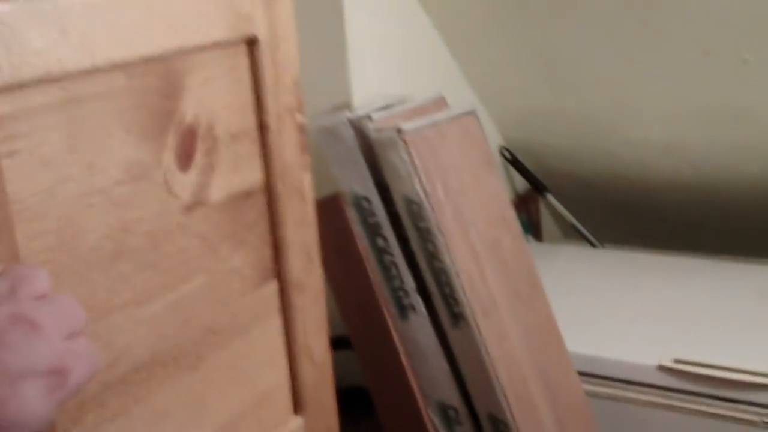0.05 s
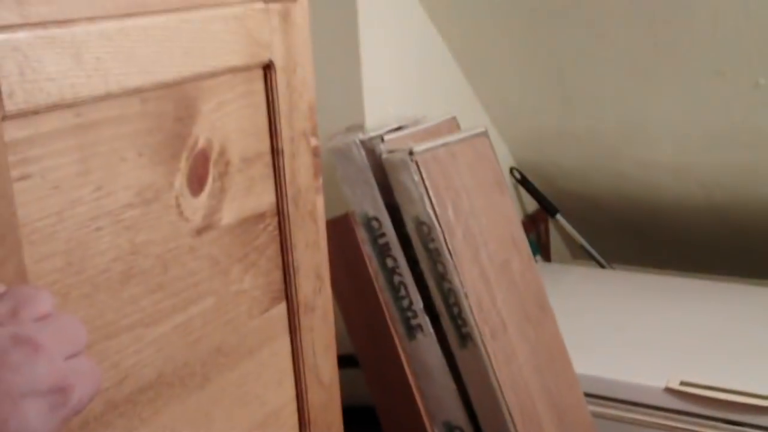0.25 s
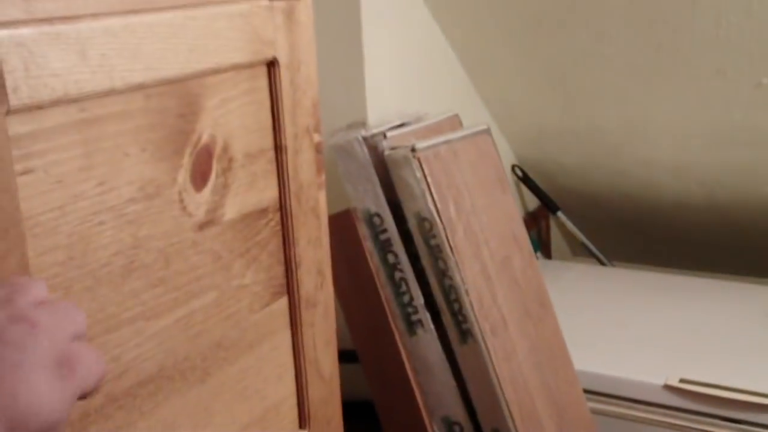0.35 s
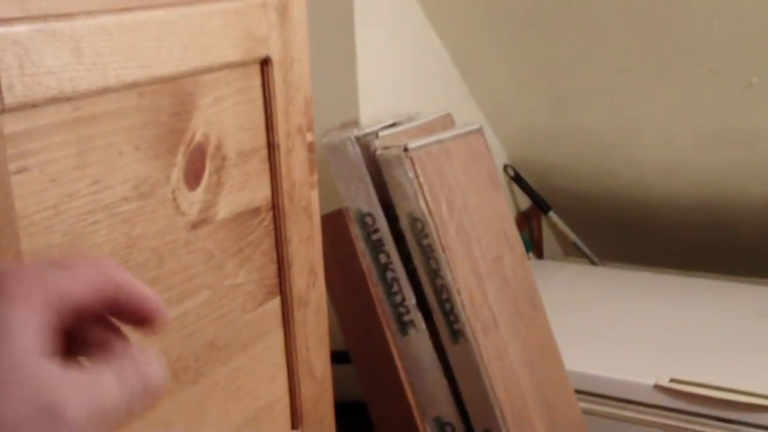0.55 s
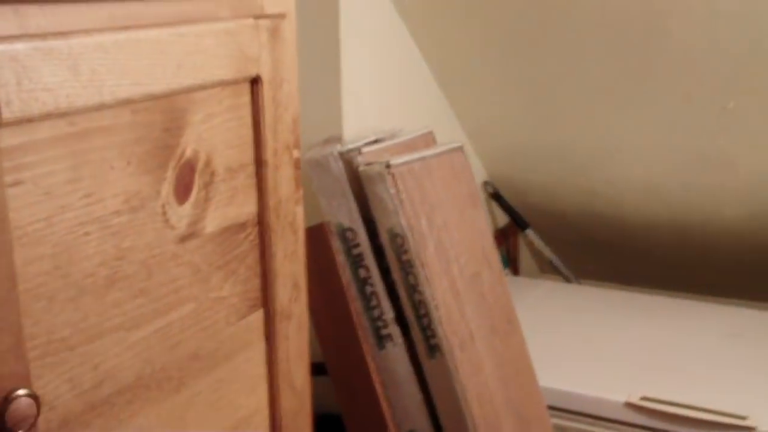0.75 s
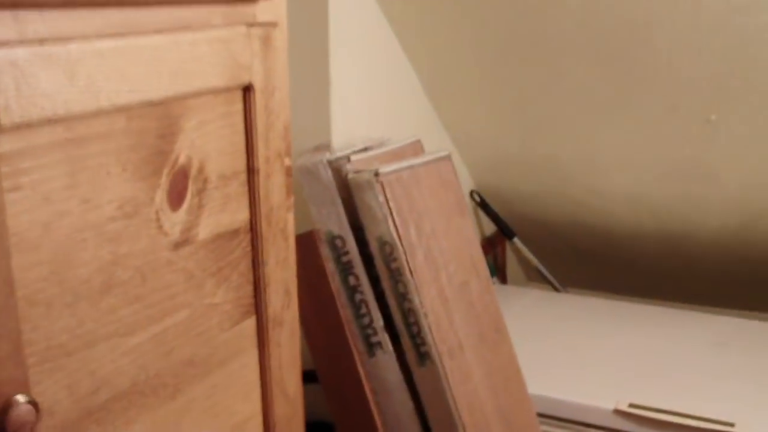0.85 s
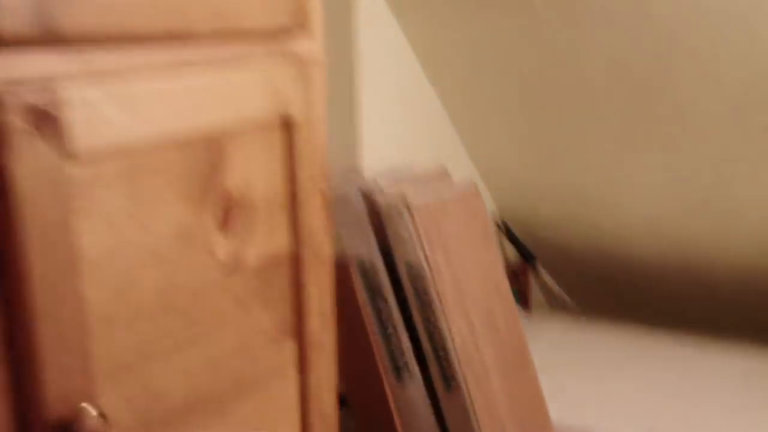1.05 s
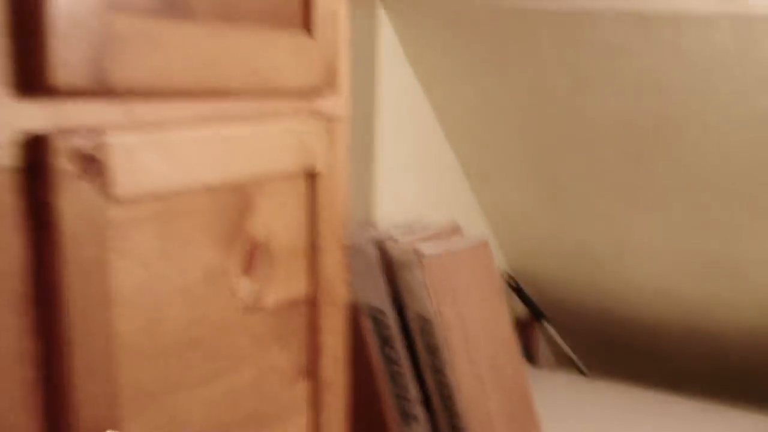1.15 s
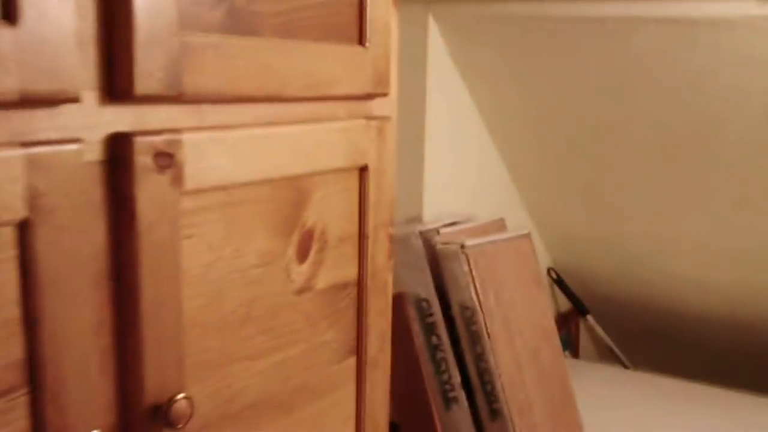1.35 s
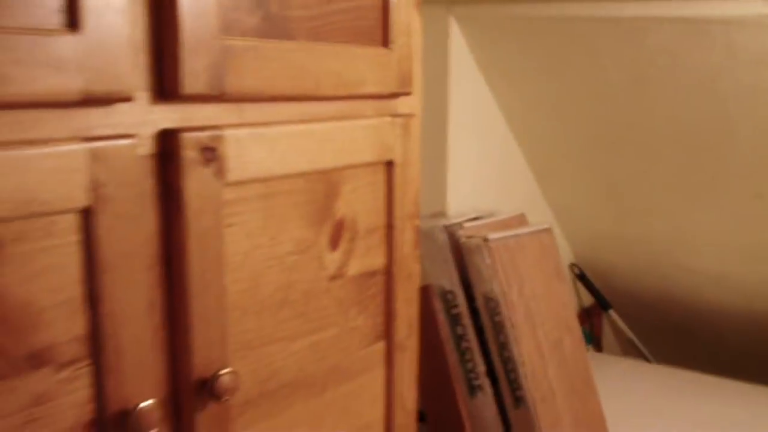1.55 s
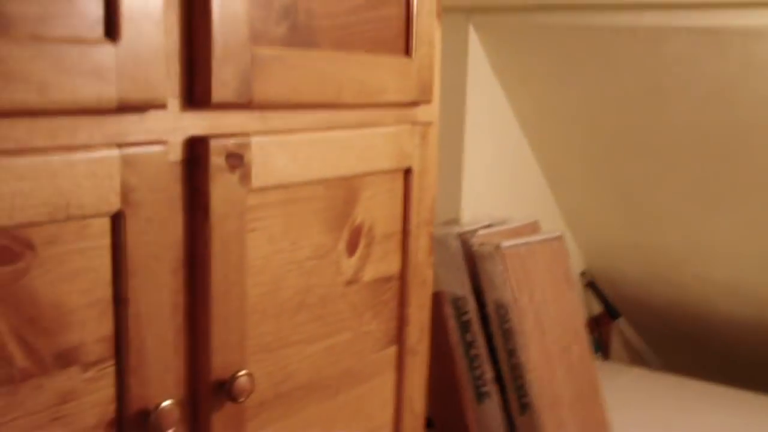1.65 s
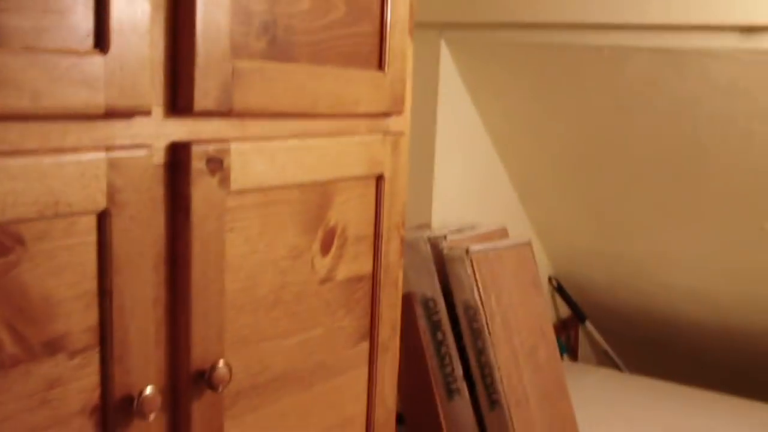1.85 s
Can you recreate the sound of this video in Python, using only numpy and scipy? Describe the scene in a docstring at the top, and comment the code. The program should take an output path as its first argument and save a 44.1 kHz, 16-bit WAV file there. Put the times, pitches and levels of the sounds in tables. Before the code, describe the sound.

Close to the microphone, a cupboard door bangs sharply on its frame and overloads briefly, its woody ring dying fast in a small room; quiet scuffs and rustling come later over low rumble and hiss.

```python
"""In a small workshop, over rumble, hum and hiss (shaped noise and wavering sines), something shuffles faintly.
A pine cabinet door is then pushed shut close by: it claps on the frame, chatters and the carcass booms.
Pushes ring the wood's modes, noise makes the cracks and the room's answer; the blow overloads the recorder.
Afterwards feet and clothes shuffle faintly: grains of friction through hollow resonances and a bright colour."""
import sys
import numpy as np
from scipy import signal
from scipy.fft import rfft, irfft
from scipy.io import wavfile

SR = 44100
rng = np.random.default_rng(int(sys.argv[2]) if len(sys.argv) > 2 else 0)


def unload_wav(signal):
    """Save mono or channel-first audio to the path in sys.argv[1] as 16-bit WAV at rate SR, clipped to [-1, 1]."""
    wavfile.write(
        sys.argv[1],
        SR,
        np.round(np.clip(np.atleast_2d(signal).T, -1, 1) * 32767).astype(np.int16),
    )


def natural_amplitude(level_db):
    """Convert a level in decibels to a linear amplitude factor, elementwise."""
    exponent = np.asarray(level_db, float) / 20
    return 10 ** exponent


N = 83790  # length in samples, 1.9 s


def unit(x):
    """Scale to rms 1."""
    return x / np.sqrt(np.mean(x ** 2) + 1e-20)


def at_hz(points, hz):
    """Read a table on a log-frequency axis."""
    table_hz, values = np.array(points).T
    return np.interp(np.log(hz), np.log(table_hz), values)


def coloured(white, spectrum):
    """Shape noise to a spectrum; rms 1."""
    hz = np.maximum(np.arange(N // 2 + 1) * SR / N, 1)
    return unit(irfft(rfft(white) * natural_amplitude(at_hz(spectrum, hz)), N))


def drift(rate_hz):
    """Slow random wander of rms 1: noise through two equal poles at rate_hz."""
    hop = 40  # samples between computed points
    r = np.exp(-2 * np.pi * rate_hz * hop / SR)
    noise = rng.standard_normal(N // hop + 2002)
    slow = signal.lfilter([1], [1, -2 * r, r * r], noise)[2000:]  # drop the filter's run-in
    return np.interp(np.arange(N) / hop, np.arange(len(slow)), unit(slow))


def band_pass(x, order, low_hz, high_hz):
    """Keep one band with a Butterworth filter."""
    return signal.sosfilt(signal.butter(order, [low_hz, high_hz], "band", fs=SR, output="sos"), x)


# The door meets the frame and rebounds. Each row: start in seconds, strength in dB,
# hardness as the contact's cut-off in Hz, weight in dB added to the modes under 200 Hz.
CONTACT_BLOWS = [(0.2051, -10.5, 5000, -26), (0.2069, -2.5, 7560, -1.5), (.2135, -4, 5050, -1.5),
                 (.2195, 0, 1980, -22), (.228, -5, 2950, -33), (0.2379, -11.5, 2010, -17),
                 (.283, -23.5, 900, -23), (0.348, -30, 300, -1.8), (.445, -41.5, 900, -1),
                 (.472, -39, 900, -.3)]
# Modes of door panel and carcass. Each row: frequency in Hz, relative level in dB, t60 in seconds.
WOOD_MODES = [(61.2, -9, 0.6), (95.2, 0, 0.28), (121.4, 1.5, 0.22), (149.2, -5.5, 0.243), (266.8, -13, .25),
              (396.4, -7.5, 0.15), (432.5, -5.5, .1), (462.4, -15, 0.21), (768.6, -0.5, 0.12),
              (1008, -7.5, 0.11), (1111.8, -4.5, .11), (1257, -11, 0.11), (1603, -5, .12),
              (1705, -8.5, 0.17), (2012, -10, 0.046), (2512, -3.5, 0.045), (3010, -9, 0.041),
              (3510, 0.5, 0.039), (4493, -7.5, 0.13)]


def door():
    """Each contact is a low-passed push that rings every mode of the wood."""
    wood_db, mode_spread_db, weight_below_hz = -4.5, 3, 200
    rise_cycles = 0.58  # time constant of a mode's build-up
    out = np.zeros(N)
    luck = rng.standard_normal((len(CONTACT_BLOWS), len(WOOD_MODES)))
    for (start_s, strength_db, cut_hz, weight_db), draws in zip(CONTACT_BLOWS, luck):
        first = int(start_s * SR)
        for (hz, level_db, t60), draw in zip(WOOD_MODES, draws):
            n = min(N - first, int(2 * t60 * SR))
            t = np.arange(n) / SR
            mode_db = wood_db + strength_db + level_db + mode_spread_db * draw
            mode_db += weight_db * (hz < weight_below_hz)
            gain = natural_amplitude(mode_db) / (1 + (hz / cut_hz) ** 2)
            rise = 1 - np.exp(-hz * t / rise_cycles)
            out[first:first + n] += gain * np.sin(2 * np.pi * hz * t) * natural_amplitude(-60 * t / t60) * rise
    return out


# Colour of the cracks and their room tail. Each row: frequency in Hz, relative density in dB per Hz.
CLAP_COLOUR = [(88, -19), (150, -5.5), (310, -8), (440, -5), (593, -9.5), (760, -6), (1080, -9.5),
               (2620, -3), (4530, -4), (7000, -5.5), (10000, -8), (13500, -35.5)]
# Decay of the room. Each row: frequency in Hz, t60 in seconds.
ROOM_T60 = [(150, 0.34), (500, 0.29), (1500, .19), (5000, .17), (12000, 0.21)]


def clap():
    """Cracks at the contacts and the room's diffuse answer: noise dying band by band."""
    crack_db, crack_s = 6, 0.0069  # crack_s: decay time constant
    tail_db, tail_rise_s = 1.5, 0.0055
    late_db, late_t60_s = -31, 0.69  # weaker, slower second slope, relative to the first
    noise = coloured(rng.standard_normal(N), CLAP_COLOUR)
    t, out = np.arange(N) / SR, np.zeros(N)
    edges = 100 * 2 ** np.arange(0, 7.6, 0.5)  # half octaves
    for low, high in zip(edges, edges[1:]):
        hz, power = np.sqrt(low * high), np.zeros(N)
        for start_s, strength_db, cut_hz, _ in CONTACT_BLOWS:
            age = np.clip(t - start_s, 0, 1)
            crack = natural_amplitude(crack_db) * np.exp(-age / crack_s)
            decay = natural_amplitude(-60 * age / at_hz(ROOM_T60, hz)) + natural_amplitude(late_db - 60 * age / late_t60_s)
            tail = natural_amplitude(tail_db) * decay * (1 - np.exp(-age / tail_rise_s))
            push = natural_amplitude(strength_db) / (1 + (hz / cut_hz) ** 2)
            power += (t >= start_s) * ((crack + tail) * push) ** 2
        out += np.sqrt(power) * band_pass(noise, 2, low, high)
    return out


# Moves of feet and clothes. Each row: start in seconds, time until the fade in seconds,
# dull scuff in dB, bright rustle in dB, pitch factor of the scuff.
SHUFFLE_MOVES = [(.002, 0.2, -56.5, -75, 0.783), (0.938, 0.13, -52.5, -56.5, 1.19),
                 (1.104, 0.095, -47.5, -52.5, 0.94), (1.279, 0.13, -52.5, -48, 1),
                 (1.517, 0.08, -43, -43.5, 0.96), (1.624, 0.051, -58.5, -63, 0.94),
                 (1.778, 0.065, -41.5, -49.5, 1.05), (1.867, .05, -52, -59, 1.25)]
# Hollow resonances of the scuff. Each row: frequency in Hz before the pitch factor, width in Hz,
# relative level in dB.
SCUFF_RESONANCES = [(558, 87, -1), (809, 100, -3.5), (963, 67, -3.5), (1340, 430, -9)]
# Colour of the bright rustle. Each row: frequency in Hz, relative density in dB per Hz.
RUSTLE_COLOUR = [(880, -12.5), (1500, -5), (2060, -6), (7990, -6), (13000, -14.5), (14000, -34)]


def shuffles():
    """Grainy friction: a dull part through hollow resonances and a bright rustle, fading together."""
    attack_s, release_s = 0.018, 0.055
    scuff_swell_s = 0.04  # the dull part grows more slowly
    grains_per_s, grain_spread_db = 3000, 1
    t = np.arange(N) / SR
    sizes = natural_amplitude(grain_spread_db * np.minimum(rng.exponential(1, (2, N)), 3.0))
    grains = (rng.random((2, N)) < grains_per_s / SR) * sizes * rng.choice([-1, 1], (2, N))
    dull, bright = np.zeros(N), np.zeros(N)
    for start_s, length_s, dull_db, bright_db, pitch in SHUFFLE_MOVES:
        scuff = np.zeros(N)
        for hz, width_hz, db in SCUFF_RESONANCES:
            r = np.exp(-np.pi * width_hz / SR)
            poles = [1, -2 * r * np.cos(2 * np.pi * pitch * hz / SR), r * r]
            scuff += natural_amplitude(db) * unit(signal.lfilter([1, 0, -1], poles, grains[0]))
        age = t - start_s
        shape = np.clip(age / attack_s, 0, 1) * np.exp(-np.maximum(age - length_s, 0) / release_s)
        swell = np.clip(age / scuff_swell_s + 0.34, 0, 1)
        dull += natural_amplitude(dull_db) * shape * swell * unit(scuff)
        bright += natural_amplitude(bright_db) * shape
    rustle = coloured(grains[1] + 0.27 * rng.standard_normal(N), RUSTLE_COLOUR)
    return dull * natural_amplitude(1.3 * drift(14)) + bright * rustle * natural_amplitude(1.3 * drift(19))


# Colour of rumble and hiss. Each row: frequency in Hz, relative density in dB per Hz.
ROOM_COLOUR = [(15, -48), (25, -5), (58, 3), (91, -3.5), (146, 1), (190, -4), (241, -3.5), (313, -5),
               (550, -12), (3500, -16.5), (9500, -17.5), (11500, -25.5), (13400, -22.5)]
# Hum partials. Each row: frequency in Hz, level in dB rms about which it wavers.
HUM_PARTIALS = [(118, -61), (233, -57.5)]


def room_tone():
    """Rumble and hiss as one shaped noise, plus hum sines that waver in level and phase."""
    room_db = -46  # rms, about which the noise drifts
    t, hum = np.arange(N) / SR, np.zeros(N)
    for hz, db in HUM_PARTIALS:
        level = np.sqrt(2) * natural_amplitude(db + 1.2 * drift(2.9))
        hum += level * np.sin(2 * np.pi * hz * t + 0.82 * drift(3.3))
    return natural_amplitude(room_db + 0.42 * drift(9)) * coloured(rng.standard_normal(N), ROOM_COLOUR) + hum


def scene():
    """The door in the middle, shuffles and room tone a touch to the left."""
    shuffle_pan_db, room_pan_db = 0.38, 0.41  # up on the left, down on the right
    left_right = np.array([[1], [-1]])
    moves = shuffles() * natural_amplitude(shuffle_pan_db * left_right)
    room = room_tone() * natural_amplitude(room_pan_db * left_right)
    return door() + clap() + moves + room


# Bands where the two ports differ. Each row: low edge in Hz, high edge in Hz, side level in dB.
PORT_DIFFERENCES = [(192, 590, -33.5), (900, 1390, -20), (3880, 5200, -17)]


def band_limit(x):
    """A steep low-pass at the top of the band."""
    return signal.sosfilt(signal.butter(12, 15570, fs=SR, output="sos"), x)


def record(dry):
    """Two close ports differ a little in some bands; bass and top are cut, peaks are clipped flat."""
    port_lag_s, top_hz, mic_low_hz, overload = 0.0017, 13650, 44.7, 1.0
    late = np.interp(np.arange(N) - port_lag_s * SR, np.arange(N), dry.mean(axis=0))
    side = np.zeros(N)
    for low_hz, high_hz, db in PORT_DIFFERENCES:
        side += natural_amplitude(db) * band_pass(late, 3, low_hz, high_hz)
    x = signal.sosfilt(signal.ellip(12, 0.2, 70, top_hz, fs=SR, output="sos"), dry)
    x = signal.sosfilt(signal.butter(2, mic_low_hz, "high", fs=SR, output="sos"), x)
    clipped = np.clip(x, -overload, overload)
    mix = clipped + side * [[1], [-1]]  # opposite sign in the two channels
    return band_limit(mix)


dry = scene()
out = record(dry)
unload_wav(out)
```